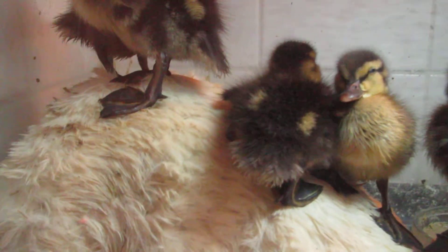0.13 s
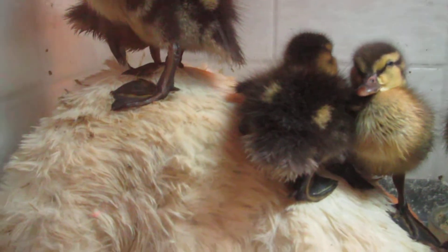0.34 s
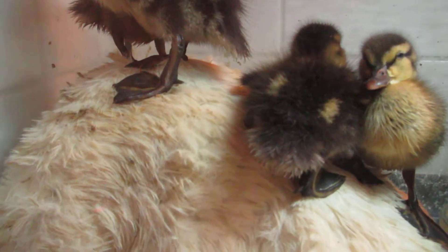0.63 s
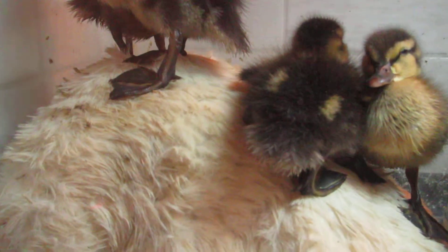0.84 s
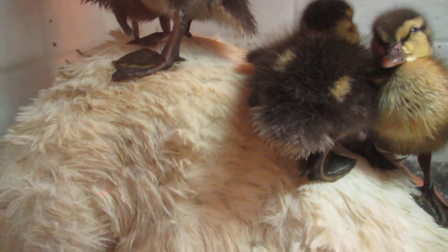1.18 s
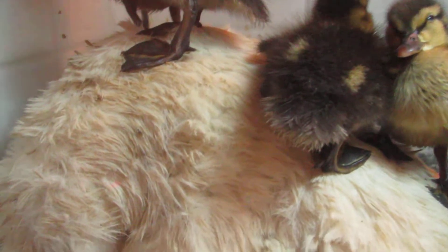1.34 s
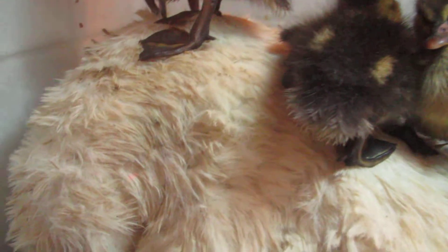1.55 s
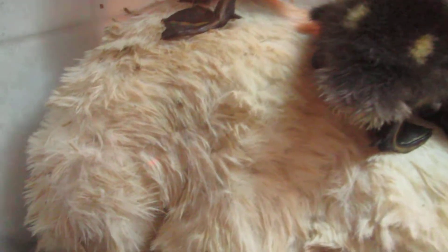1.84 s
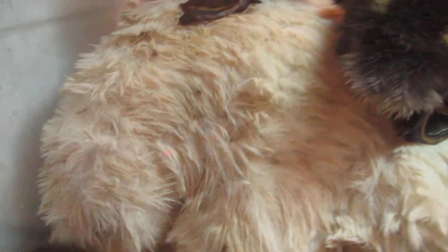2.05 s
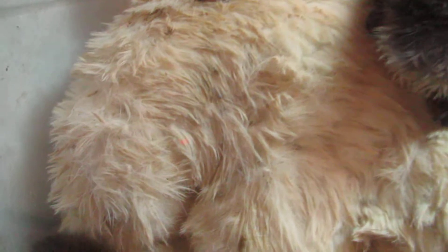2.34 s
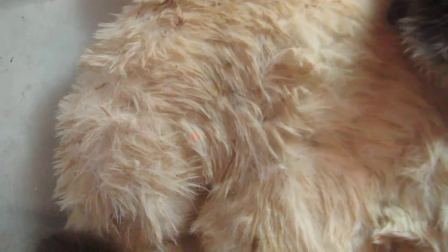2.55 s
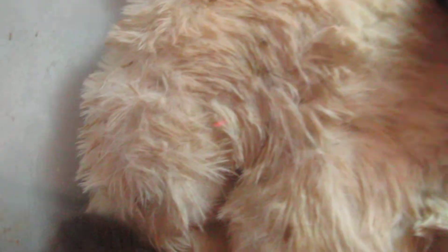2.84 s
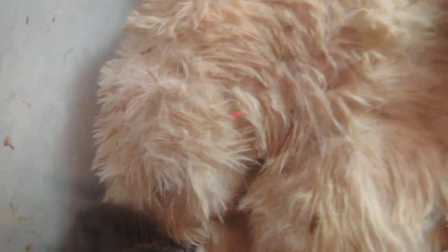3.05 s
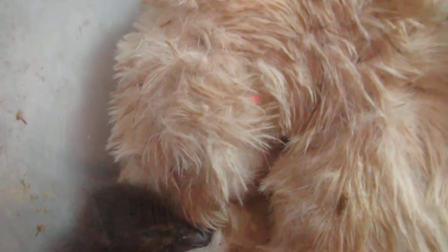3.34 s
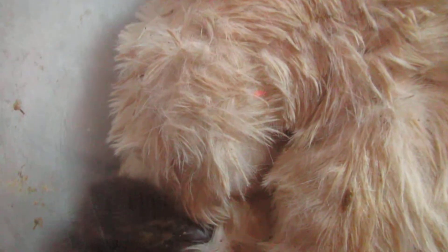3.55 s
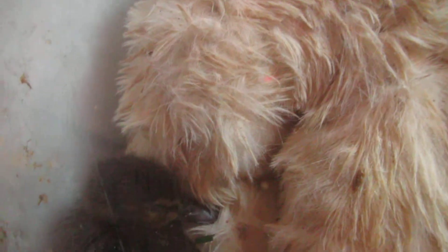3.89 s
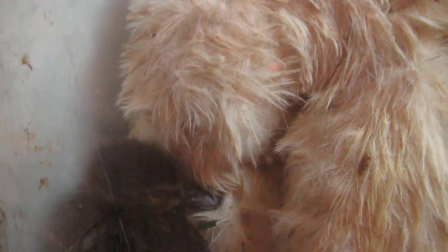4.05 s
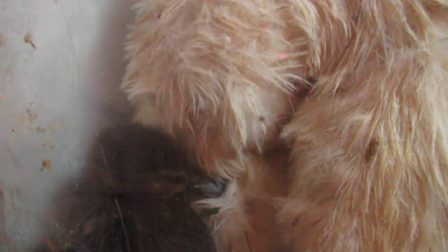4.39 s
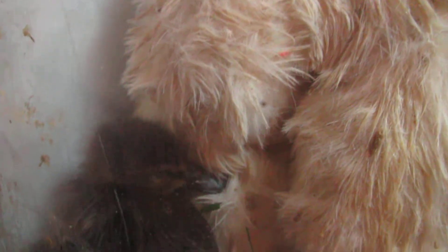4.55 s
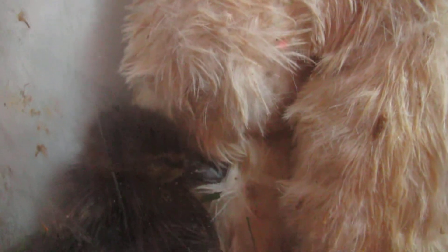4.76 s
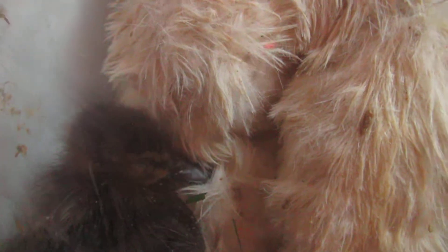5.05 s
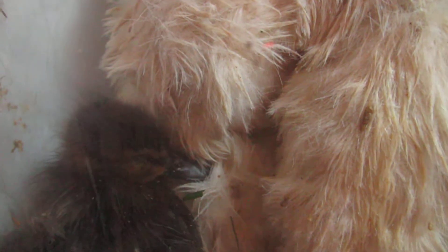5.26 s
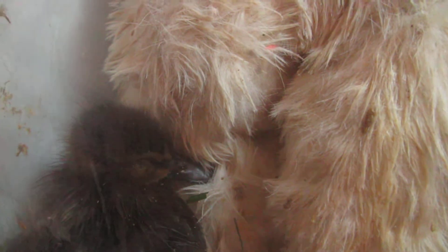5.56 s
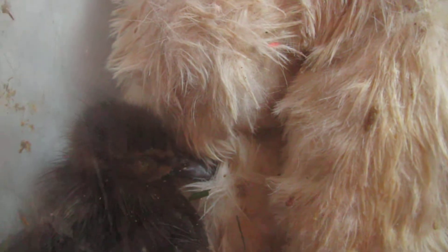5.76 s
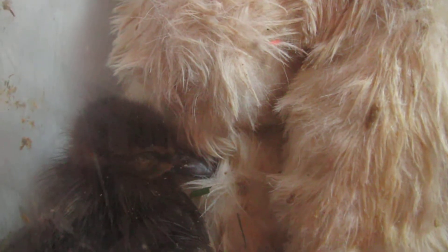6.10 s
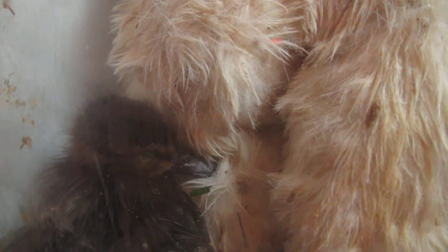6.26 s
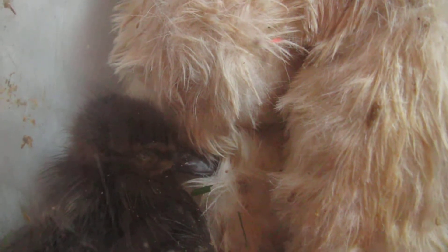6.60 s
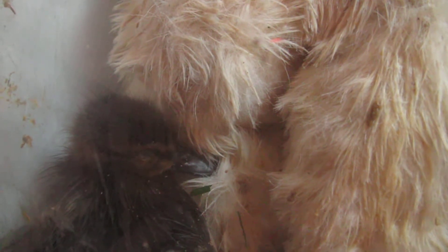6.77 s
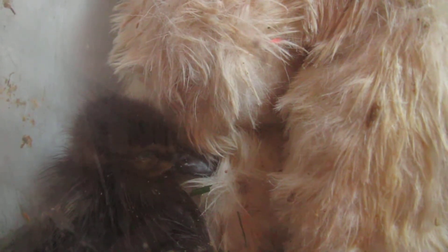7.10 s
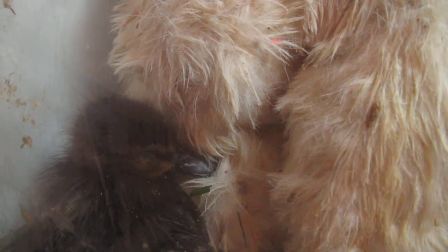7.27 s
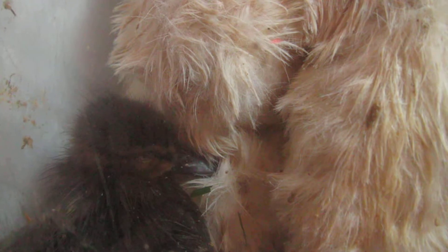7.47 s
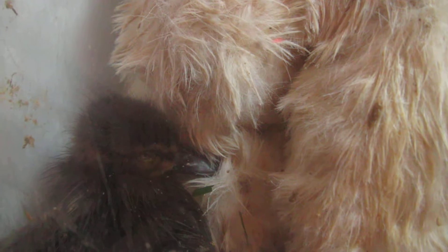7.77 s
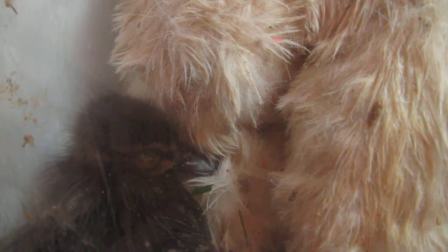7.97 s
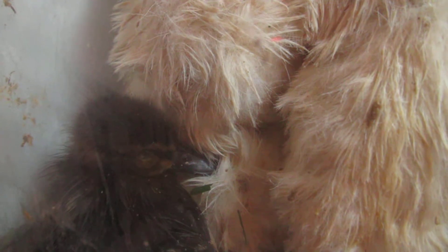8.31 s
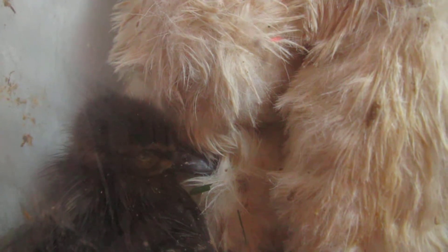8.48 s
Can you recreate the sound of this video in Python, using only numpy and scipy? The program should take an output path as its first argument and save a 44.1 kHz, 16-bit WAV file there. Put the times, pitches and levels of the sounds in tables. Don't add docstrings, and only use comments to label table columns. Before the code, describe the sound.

Inside a small, hard-walled pen, three soft foot knocks and a thin falling peep open over hiss and low shuffling. Down rustles at 0.4 s. At 0.95-1.17 s one duckling cries loudly in a two-humped warble around 1.5-2.3 kHz, snapping shut roughly. A hoarse quack and a deep-diving peep follow at 1.4 s, shrill peeps near 2 s, with dim dove coos until 3.7 s. Soft falling peeps come at 2.7 and 2.9 s; a quieter arched cry at 3.6-3.85 s. Peeps cluster from 4.5 to 5 s, some raspy. The loudest warble bursts at 5.35-5.57 s, then an arched cry to 5.93 s. Six regular, higher peeps run from 6 to 7.4 s, with a quack at 7.1 s. Rubbing squeaks, weak whimpers at 7.55 s, a tiny metallic ring at 7.7 s and faint coos lead into final ticks and hiss, ending around 8.6 s.

```python
import sys
import numpy as np
from scipy import signal
from scipy.fft import rfft, irfft
from scipy.io import wavfile
from scipy.ndimage import uniform_filter1d

SR = 44100
rng = np.random.default_rng(int(sys.argv[2]) if len(sys.argv) > 2 else 0)


def output_pcm(signal):
    pcm = np.clip(np.atleast_2d(signal).T, -1, 1) * 32767
    wavfile.write(sys.argv[1], SR, np.round(pcm).astype(np.int16))


def natural_amplitude(level_db):
    exponent = np.asarray(level_db, float) / 20
    return 10 ** exponent


N = 381006

# (time [s], pitch [Hz], level [dB], overtones [dB])
WARBLES = [
    [(.95, 1426, -40, -19), (.975, 1473, -27, -18.5), (1.01, 1697, -21.5, -11.5), (1.055, 2148, -21, -21.5),
     (1.085, 1732, -19.5, -23), (1.12, 1791, -27, -22.5), (1.132, 2297, -19, -17), (1.158, 2343, -17, -30),
     (1.166, 1568, -24, 3.5)],
    [(5.337, 1435, -48.5, -15), (5.373, 1526, -28, -9.5), (5.395, 1738, -15.5, -9.5),
     (5.437, 2217, -17, -28), (5.47, 1741, -15.5, -24.5), (5.503, 1802, -16, -34),
     (5.53, 2171, -19.5, -20.5), (5.548, 2162, -14, -25.5), (5.563, 1643, -21.5, -13.5)],
]
# (time [s], pitch [Hz], level [dB], overtones [dB])
ARCHES = [
    [(3.592, 1491, -44, -14), (3.6, 1519, -35.5, -10), (3.63, 1445, -37, -5), (3.67, 1657, -36, -5),
     (3.71, 2118, -28, -9), (3.755, 2372, -31.5, -9), (3.8, 2073, -24, -10), (3.835, 1975, -32.5, -10.5),
     (3.843, 1709, -30.5, -2)],
    [(5.665, 1500, -42, 1), (5.69, 1673, -32, -13), (5.72, 1582, -38.5, -4), (5.77, 2039, -25, -14),
     (5.82, 2271, -27, -9), (5.87, 2166, -24.5, -10.5), (5.905, 1984, -28.5, -9.5),
     (5.932, 1481, -33, -10.5)],
]
# (time [s], pitch [Hz], level [dB], overtones [dB])
WHIMPERS = [
    [(7.525, 1500, -48.5, -11.5), (7.545, 1636, -43, -9), (7.58, 1798, -42, -13), (7.603, 2515, -42.5, -21),
     (7.62, 2856, -46, -22), (7.66, 2870, -38.5, -23.5), (7.69, 2807, -72, -14)],
    [(7.585, 1905, -48.5, -1), (7.61, 2090, -48, -7.5), (7.67, 2246, -48.5, -20.5),
     (7.705, 2220, -51.5, -17.5)],
]
CRY_SHAKE = [.018, .011, .02, .015, .045, .09]
CRY_FALL = [18.363, 24.7, 11.1, 10.636, 10.39, 11.22]
CRY_BREATH = [-42, -46, -53, -52, -33, -33]
CRY_PARTIALS = [6, 6, 5, 6, 4, 4]
CRY_RASP = [-4, 1, -0.5, 0, -11, -8]
CRY_THROB = [.55, .35, .6, .65, .5, .5]
CRY_BLUR = [.2, .24, .3, .3, .3, .3]
# (frequency [Hz], gain [dB])
CRY_THROAT = [(1000, -6), (1750, -2.5), (2000, -1), (2700, 2), (3300, 4.5), (4000, -3), (4500, -1),
              (5400, 1), (6500, -6), (8600, -2.5), (10500, -7), (12000, -22), (16000, -33)]
# (frequency [Hz], gain [dB])
BREATH_COLOUR = [(1500, -22.5), (3500, 10), (6000, 0), (9000, 7.5), (11000, 11), (13300, 14.5),
                 (15000, -15)]

# (time [s], length [s], top pitch [Hz], end pitch [Hz], level [dB])
EASING_PEEPS = [(.208, 0.08719, 3328, 2413, -43.5), (2.715, 0.08185, 3044, 2428, -41),
                (2.94, 0.08482, 3333, 2424, -40.5), (3.975, 0.0917, 3296, 2439, -41.5),
                (4.5, 0.092, 3285, 2482, -40.5), (4.72, 0.09061, 3831, 2534, -39),
                (4.955, 0.0874, 3740, 2470, -41)]
# (time [s], length [s], top pitch [Hz], end pitch [Hz], level [dB])
MASKED_PEEPS = [
    (3.76, 0.03706, 3106, 2484, -39),
    (5.408, 0.04574, 3430, 2670, -37.5),
    (5.618, .078, 3791, 2665, -38),
    (5.632, 0.05578, 4290, 3456, -40),
]
# (time [s], length [s], top pitch [Hz], end pitch [Hz], level [dB])
CLIPPED_PEEPS = [(.75, 0.03852, 3760, 3365, -64), (.825, 0.04373, 3940, 3260, -57.5),
                 (1.53, 0.03984, 2518, 2445, -47.5), (1.955, 0.02276, 3309, 2220, -55.5),
                 (4.135, 0.01824, 2885, 2749, -62), (4.24, 0.01777, 2829, 2791, -63),
                 (4.778, .02, 5100, 4500, -57.5), (4.997, 0.02565, 6137, 4800, -53.5)]
# (time [s], length [s], top pitch [Hz], end pitch [Hz], level [dB])
LEVELLING_PEEPS = [(5.975, 0.08643, 3891, 2954, -38.5), (6.182, 0.09472, 4409, 2951, -38.5),
                   (6.453, 0.08965, 4197, 2918, -38), (6.677, 0.09011, 4370, 2861, -41),
                   (7.149, 0.085, 3865, 2838, -39), (7.372, 0.08277, 4151, 3044, -39)]
# (time [s], length [s], top pitch [Hz], end pitch [Hz], level [dB])
DIVING_PEEPS = [
    (1.466, .068, 4451, 2460, -37.5),
]
# (time [s], length [s], top pitch [Hz], end pitch [Hz], level [dB])
SHRILL_PEEPS = [
    (1.958, 0.061, 4420, 3490, -41.5),
    (2.204, .086, 5012, 3463, -42),
]
# (time [s], length [s], top pitch [Hz], end pitch [Hz], level [dB])
BRIGHT_PEEPS = [
    (4.785, 0.054, 4298, 2506, -38),
    (4.99, .075, 4590, 2500, -42.5),
]
# (time [s], length [s], top pitch [Hz], end pitch [Hz], level [dB])
FLICK_PEEPS = [
    (1.91, .045, 6200, 5600, -69),
    (2.17, .04, 6170, 5400, -67),
]
# (time [s], length [s], top pitch [Hz], end pitch [Hz], level [dB])
RASPY_PEEPS = [
    (4.642, 0.035, 4014, 3314, -53.5),
    (4.728, 0.058588, 3896, 3526, -44),
    (4.808, 0.055, 3964, 3349, -41),
]
# (frequency [Hz], gain [dB])
PEEP_THROAT = [(2000, 15.5), (2500, -2.5), (3050, 4), (3200, -4.5), (3350, 1.5), (4000, -4), (5000, -5.5),
               (6500, -9), (8000, 7.5), (12000, -4)]

# (time [s], length [s], top pitch [Hz], level [dB])
QUACKS = [
    (1.358, 0.12156, 534.4, -40.5),
    (3.31, 0.08555, 529.7, -43.5),
    (4.34, 0.1022, 527.7, -45),
    (5.184, 0.1, 519.2, -45),
    (7.105, 0.117, 527.8, -42),
]
# (frequency [Hz], gain [dB])
BILL = [(500, -14), (1050, -14.5), (1570, -8), (2100, -0.5), (2600, -11), (3150, -4.5), (3700, -13.5),
        (4500, -23), (5500, -19), (7000, -46.5)]
# (time [s], length [s], pitch [Hz], level [dB])
COOS = [(1.56, .16, 308, -60), (2.05, .27, 308, -58), (2.4, .25, 295, -60), (2.72, .28, 305, -59),
        (3.33, .2, 305, -57), (3.54, .22, 310, -56.5), (7.63, .2, 290, -55.5), (7.9, .19, 290, -56.5)]

# (time [s], peak level [dB], ring [Hz])
KNOCKS = [(0.004, -39.5, 261), (0.065, -41.5, 266), (0.175, -38.5, 267), (4.131, -43, 367),
          (4.524, -41.5, 257), (.726, -62, 300), (.862, -70, 300), (5.161, -69.5, 283), (5.351, -50, 225),
          (5.459, -40.5, 273), (6.932, -49.5, 480), (7.679, -45, 331.3), (8.127, -54.5, 143)]
# (time [s], peak level below 2 kHz [dB], treble level [dB])
TICKS = [(0.241, -48, -77.5), (0.727, -51, -72.5), (0.861, -50, -50), (2.032, -47, -69.5),
         (2.433, -57, -50.5), (2.556, -71, -55.5), (3.5, -55, -87), (6.962, -65, -66), (7.848, -54, -66.5),
         (8.299, -70, -59)]
# (time [s], length [s], centre [Hz], level [dB])
RUSTLES = [(0.428, 0.19, 9272, -60.5), (0.432, 0.2096, 2970, -61), (0.84, 0.032, 11150, -69.5),
           (1.368, 0.03, 9500, -59), (1.953, 0.0558, 7760, -58), (2.031, 0.04012, 2647, -47.5),
           (2.035, 0.036, 8754, -57), (6.743, 0.16, 1408, -54.5), (7.11, 0.099, 9128, -62),
           (7.302, 0.061, 9417, -57.5), (7.43, 0.11, 9525, -59), (7.438, 0.053, 4205, -64.5),
           (7.566, 0.17, 10940, -71), (8.136, 0.0462, 8250, -68), (8.21, 0.01544, 1180, -49.5),
           (8.214, 0.065, 523.9, -46.5)]
# (time [s], length [s], centre [Hz], level [dB])
SQUEAKS = [(0.428, 0.2256, 8708, -64.5), (0.433, 0.3655, 1257, -64), (0.437, 0.242, 4226, -69),
           (0.457, 0.2646, 2423, -65.5), (0.85, 0.0202, 5495, -64.5), (2.035, 0.032, 458.8, -48),
           (2.045, 0.036, 1244, -60.5), (6.586, 0.1314, 11760, -69), (6.743, 0.1335, 553, -58.5),
           (7.301, 0.05493, 1695, -47.5), (7.303, 0.0537, 4181, -61), (7.425, 0.0611, 4160, -62),
           (7.425, 0.0999, 1755, -53), (7.44, 0.0433, 2345, -51), (7.61, 0.0815, 5649, -54)]
# (frequency [Hz], level [dB], 60 dB decay [s])
METAL_MODES = [(5326.4, -6, 0.1417), (5762, -31.5, 0.24), (8600, -4.5, 0.1837), (12900, -12, 0.1497)]

# (frequency [Hz], gain [dB])
WALLS_ALIKE = [(100, 3), (1500, -4.5), (6000, -2.5), (20000, -12)]
# (frequency [Hz], gain [dB])
WALLS_APART = [(100, -14), (1500, -4), (4000, -5), (8000, -5), (20000, -9)]

# (time [s], level [dB])
SHUFFLE = [(0.0, -57.5), (0.79, -73.5), (1.18, -56), (1.95, -72.5), (2.05, -53.5), (2.95, -55.5),
           (3.08, -67), (3.35, -57), (4.05, -52.5), (4.2, -50.5), (4.85, -57), (5.1, -73.5), (5.18, -47),
           (5.6, -52), (6.3, -56.5), (6.45, -67), (6.98, -56.5), (8.64, -61.5)]
# (frequency [Hz], gain [dB])
SHUFFLE_COLOUR = [(35, -77), (60, -63.5), (125, -7), (172, -7.5), (274, 6), (522, -2.5), (599, -7.5),
                  (900, -16), (1170, -43.5), (1980, -120)]
# (frequency [Hz], gain [dB])
HISS_MID = [(15, -54.5), (25, -31), (64, -18), (227, -5), (298, -1), (873, -7), (1380, -4.5), (1500, -7.5),
            (3010, -13.5), (4160, -24), (5450, -21), (6400, -29), (8610, -20), (12200, -28.5), (15600, -39)]
# (frequency [Hz], gain [dB])
HISS_SIDE = [(15, -58), (25, -37.5), (188, -8.5), (599, -5), (704, -4), (806, -5), (973, -5.5), (1080, -7),
             (2780, -20), (4280, -34.5), (5450, -34), (6580, -40.5), (8380, -31.5), (11300, -34),
             (15600, -48.5)]


def read(points, hz):
    f, db = np.transpose(points)
    return natural_amplitude(np.interp(np.log(np.maximum(hz, 1)), np.log(f), db))


def unit(x):
    return x / np.sqrt(np.mean(x ** 2))


def noise(points, size=N):
    hz = np.arange(size // 2 + 1) * SR / size
    spectrum = rfft(rng.standard_normal(size)) * read(points, hz)
    return unit(irfft(spectrum, size))


def walk(rate):
    k = int(SR / rate)
    held = np.repeat(rng.standard_normal(N // k + 1), k)
    return unit(uniform_filter1d(uniform_filter1d(held, k), k)[:N])


def add(track, s, x):
    i = int(s * SR)
    track[i:i + len(x)] += x[:N - i]


def curves(table, soft_s):
    s, *columns = np.transpose(table)
    t = np.arange(s[0], s[-1], 1 / SR)
    size = int(soft_s * SR) + 1
    return s[0], [uniform_filter1d(np.interp(t, s, c), size, mode="nearest") for c in columns]


def voice(hz, over_db, fall_db, body, wobble, count, flutter_db=3, blur=0.):
    slow = np.hanning(160)
    shake = unit(np.convolve(rng.standard_normal(len(hz)), slow, "same"))
    flutter = unit(np.convolve(rng.standard_normal(len(hz)), slow, "same"))
    phase = 2 * np.pi * np.cumsum(hz * (1 + wobble * shake)) / SR
    out = np.sqrt(2) * read(body, hz) * np.sin(phase)
    for k in range(2, count + 1):
        gain = natural_amplitude(over_db - fall_db * np.log2(k / 2) + flutter_db * flutter) * read(body, k * hz)
        grain = unit(uniform_filter1d(rng.standard_normal(len(hz)), size=70))
        share = blur * (k - 1)
        gain = gain * (1 + share * grain) / np.hypot(1, share)
        out = out + gain * (k * hz < SR / 2.5) * np.sin(k * phase + k * k)
    return out


def cries():
    close_s, close_pitch, close_db = 0.007, 0.72, -40
    rasp_s, rasp_fall_db = 0.013, 16
    steeper = 0.63
    effort_db = 14
    throb_hz, throb_scatter = 115, .3
    gust_db, puff_db = 2.5, 13
    out = np.zeros(N)
    manners = zip(WARBLES + ARCHES + WHIMPERS, CRY_SHAKE, CRY_FALL, CRY_BREATH, CRY_PARTIALS,
                  CRY_RASP, CRY_THROB, CRY_BLUR)
    for table, shake, fall_db, air_db, partials, rasp_db, throb, blur in manners:
        end_s, end_hz, end_db, end_over = table[-1]
        shut = (end_s + close_s, end_hz * close_pitch, end_db + close_db, end_over)
        s, (hz, db, over_db) = curves(list(table) + [shut], 0.0068)
        left_s = np.arange(len(hz))[::-1] / SR
        closing = np.clip(1 - left_s / rasp_s, 0, 1) ** .5
        fall_db = fall_db + steeper * (over_db - over_db.mean()) + rasp_fall_db * closing
        over_db = over_db + (rasp_db - over_db) * closing
        effort = np.clip(1 + (db - db.max()) / effort_db, .25, 1)
        unrest = walk(60)[:len(hz)]
        beat = np.cos(2 * np.pi * np.cumsum(throb_hz * (1 + throb_scatter * unrest)) / SR)
        tone = voice(hz, over_db, fall_db, CRY_THROAT, shake * effort, partials, blur=blur * effort)
        air = natural_amplitude(air_db + gust_db * unrest + puff_db * closing) * noise(BREATH_COLOUR, len(hz))
        add(out, s, natural_amplitude(db + 0.711) * (1 + throb * effort * beat) * (tone + air))
    return out


def duckling(table, rise, bend, weak_db, swell_share, over_db, fall_db, wobble,
             droop=.07, late=1.4, end=0.24):
    out = np.zeros(N)
    for s, length, top_hz, end_hz, db in table:
        u = np.arange(int(length * SR)) / (length * SR)
        fall = np.clip((u - rise) / max(1 - rise, .01), 0, 1)
        up = 2300 + (top_hz - 2300) * np.sin(np.pi / 2 * np.clip(u / rise, 0, 1))
        down = end_hz + (top_hz - end_hz) * (1 - fall) ** bend
        hz = uniform_filter1d(np.where(u < rise, up, down), 250, mode="nearest")
        hz = hz * (1 - droop * np.clip((u - .88) / 0.063, 0, 1))
        swell_db = weak_db * (1 - np.clip(fall / swell_share, 0, 1)) ** late
        flick_db = -1.4 * np.clip(1 - u / rise, 0, 1) ** .5
        edges = np.clip(u / 0.027, 0, 1) * np.clip((1 - u) / end, 0, 1)
        tone = voice(hz, over_db, fall_db, PEEP_THROAT, wobble, count=3)
        add(out, s, natural_amplitude(db + swell_db + flick_db) * edges * tone)
    return out


def peeps():
    easing = duckling(EASING_PEEPS, rise=0.20513, bend=1.7, weak_db=-7.5, swell_share=0.2714,
                        over_db=-21.5, fall_db=36.5, wobble=0.004483, late=0.937, end=0.3913)
    masked = duckling(MASKED_PEEPS, rise=.02, bend=1.3, weak_db=-11, swell_share=.4,
                      over_db=-27, fall_db=20, wobble=0.007)
    clipped = duckling(CLIPPED_PEEPS, rise=0.066, bend=1.7, weak_db=-0.5, swell_share=0.31,
                       over_db=-23.0, fall_db=11.5, wobble=0.0028)
    levelling = duckling(LEVELLING_PEEPS, rise=0.11531, bend=2.9, weak_db=-17, swell_share=0.8952,
                         over_db=-22.5, fall_db=30.0, wobble=0.014524, late=4.449, end=0.2254)
    diving = duckling(DIVING_PEEPS, rise=.33, bend=1.4, weak_db=-20, swell_share=0.4633,
                      over_db=-21.5, fall_db=11, wobble=0.0065, droop=.01, late=1.604, end=0.59)
    shrill = duckling(SHRILL_PEEPS, rise=0.04084, bend=3.9, weak_db=-20.5, swell_share=0.2541,
                      over_db=-18.5, fall_db=10.0, wobble=0.010363, droop=0.2221)
    bright = duckling(BRIGHT_PEEPS, rise=0.15903, bend=1.1, weak_db=-18, swell_share=0.4192,
                      over_db=-19, fall_db=18.5, wobble=0.01141)
    flicks = duckling(FLICK_PEEPS, rise=0.93, bend=1.3, weak_db=10, swell_share=.4,
                      over_db=-48, fall_db=9, wobble=0.03)
    return easing + masked + clipped + levelling + diving + shrill + bright + flicks


def raspy_peeps():
    return duckling(RASPY_PEEPS, rise=.11, bend=1.3, weak_db=-3, swell_share=.3,
                    over_db=-28, fall_db=-22, wobble=.035)


def quacks():
    top_s, start, end = .04, .92, .975
    dulls = 2.5
    out = np.zeros(N)
    for s, length, top_hz, db in QUACKS:
        course = [(0, start * top_hz, db - 14), (.008, start * top_hz, db - 4), (top_s, top_hz, db),
                  (2 * top_s, top_hz, db - 7), (length, end * top_hz, db - 15.5)]
        _, (hz, db) = curves(course, 0.009)
        fall_db = dulls * (np.clip(np.arange(len(hz)) / (.03 * SR), 0, 1) - .8)
        tone = voice(hz, 0.0, fall_db, BILL, wobble=.003, count=13, flutter_db=4, blur=.04)
        add(out, s, natural_amplitude(db - 2) * unit(tone))
    return out


def coos():
    sag_hz_per_s, drift, arch = 115.24, .025, .07
    out = np.zeros(N)
    for s, length, hz, db in COOS:
        t = np.arange(int(length * SR)) / SR
        bow = arch * (2 * t / length - 1) ** 2
        hz = (hz - sag_hz_per_s * (t - length / 2)) * (1 + drift * walk(10.158)[:len(t)] - bow)
        level = natural_amplitude(db + 3.0 + 1.958 * walk(37.06)[:len(t)]) * np.hanning(len(t)) ** .4
        add(out, s, level * np.sin(2 * np.pi * np.cumsum(hz) / SR))
    return out


def knocks():
    out, t = np.zeros(N), np.arange(SR // 2) / SR
    for s, db, hz in KNOCKS:
        mode = [(0.23 * hz, -30), (0.5 * hz, -9), (hz, 0), (1.3977 * hz, -9), (5 * hz, -28), (20000, -70)]
        decay = natural_amplitude(db + 0.5 - 60 * t / 0.12)
        add(out, s, decay * np.clip(t / 0.0044, 0, 1) * noise(mode, len(t)))
    return out


def ticks():
    out, t = np.zeros(N), np.arange(SR // 2) / SR
    for s, db, treble_db in TICKS:
        low = noise([(200, -19.5), (600, 6.5), (1500, -7.0), (4000, -14.5), (20000, -74)], len(t))
        high = noise([(2000, -25), (6000, -3), (10000, 0), (13000, -5), (16000, -20)], len(t))
        add(out, s, natural_amplitude(db + 4.0 - 60 * t / 0.039) * low + natural_amplitude(treble_db - 6 - 60 * t / 0.052) * high)
    return out


def brushed(length, spectrum):
    t = np.arange(int(length * SR)) / SR
    return np.clip(t / .006, 0, 1) * (1 - t / length) * noise(spectrum, len(t))


def rubbing():
    out = np.zeros(N)
    for s, length, hz, db in RUSTLES:
        broad = [(hz / 12, -30), (hz / 3, -8), (hz, 0), (1.5 * hz, -15), (4 * hz, -45)]
        add(out, s, natural_amplitude(db) * brushed(length, broad))
    for s, length, hz, db in SQUEAKS:
        narrow = [(hz - 400, -60), (hz - 110, -15), (hz, 0), (hz + 110, -15), (hz + 400, -60)]
        add(out, s, natural_amplitude(db) * brushed(length, narrow))
    return out


def metal():
    out, t = np.zeros(N), np.arange(SR // 2) / SR
    for hz, db, t60 in METAL_MODES:
        decay = natural_amplitude(db - 50 - 60 * t / np.clip(t60, .05, .4))
        add(out, 7.695, decay * np.sin(2 * np.pi * hz * t))
    return out


def room(x, direct_db, pen_db, room_db):
    room_t60_s, treble_t60_s, pen_t60_s = 0.16968, 0.25284, 0.04673
    t = np.arange(int(.4 * SR)) / SR
    start = np.clip((t - .002) / 0.0015, 0, 1)
    split = signal.butter(1, 4000, fs=SR, output="sos")
    thin_walls = signal.butter(2, 900, "high", fs=SR, output="sos")
    alike, apart = noise(WALLS_ALIKE, len(t)), natural_amplitude(-1.5) * noise(WALLS_APART, len(t))
    sparse = rng.standard_normal(len(t)) * (rng.random(len(t)) < 900 / SR)
    taps = sparse * start * natural_amplitude(-60 * t / pen_t60_s)
    out = []
    for side in (1, -1):
        tail = alike + side * apart
        low = signal.sosfilt(split, tail)
        tail = start * (low * natural_amplitude(-60 * t / room_t60_s) + (tail - low) * natural_amplitude(-60 * t / treble_t60_s))
        pen = signal.sosfilt(thin_walls, taps * (1 + side * 0.7 * np.sign(apart)))
        echoes = (natural_amplitude(pen_db) * unit(pen) + natural_amplitude(room_db) * unit(tail)) / np.sqrt(len(t))
        out.append(natural_amplitude(direct_db) * x + signal.fftconvolve(x, echoes)[:N])
    return np.array(out)


def background():
    _, (db,) = curves(SHUFFLE, .05)
    db = np.pad(db, (0, N), "edge")[:N]
    shuffle_mid = natural_amplitude(db - 2.5 + 1.4 * walk(14)) * noise(SHUFFLE_COLOUR)
    shuffle_side = 0.3 * natural_amplitude(db + 2.5 * walk(14)) * noise(SHUFFLE_COLOUR)
    breathe = natural_amplitude(0.6 * walk(1.4) + 0.318 * walk(31))
    mid = natural_amplitude(-56) * noise(HISS_MID) * breathe + shuffle_mid
    side = natural_amplitude(-49.5) * noise(HISS_SIDE) * breathe + shuffle_side
    return np.array([mid + side, mid - side])


def scene():
    far = room(cries() + raspy_peeps() + quacks() + coos(), direct_db=-0.5, pen_db=-2.5, room_db=0.0)
    feet = knocks() + ticks() + rubbing() + metal()
    near = room(peeps() + feet, direct_db=1.0, pen_db=-1.5, room_db=-4.5)
    low_cut = signal.butter(3, 90, "high", fs=SR, output="sos")
    return signal.sosfilt(low_cut, far + near) + background()


def low_pass(x):
    return signal.sosfilt(signal.butter(12, 15720, fs=SR, output="sos"), x)


def record(dry):
    headroom = 2.5
    treble = signal.sosfilt(signal.butter(2, 3000, "high", fs=SR, output="sos"), dry)
    tilted = dry + treble * np.array([[-.17], [.17]])
    rounded = headroom * np.tanh(tilted / headroom)
    top_cut = signal.ellip(8, .2, 60, 15700, fs=SR, output="sos")
    return low_pass(signal.sosfilt(top_cut, rounded))


dry = scene()
out = record(dry)
output_pcm(out)
```